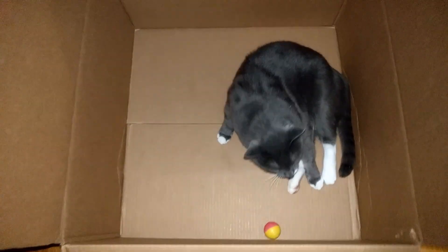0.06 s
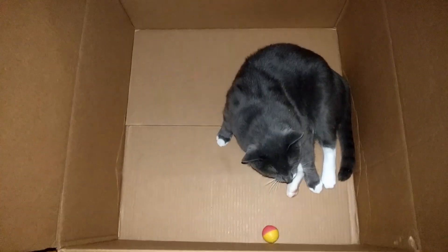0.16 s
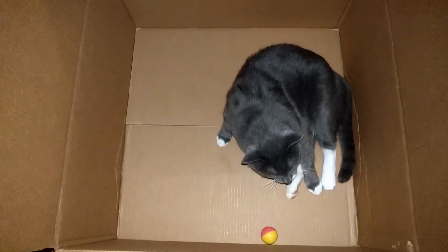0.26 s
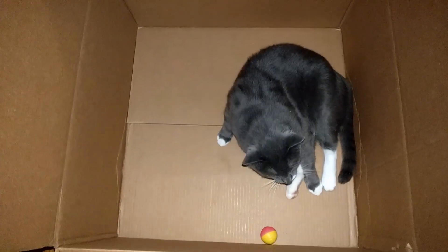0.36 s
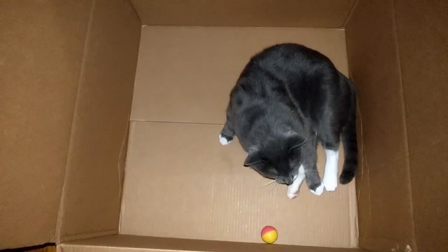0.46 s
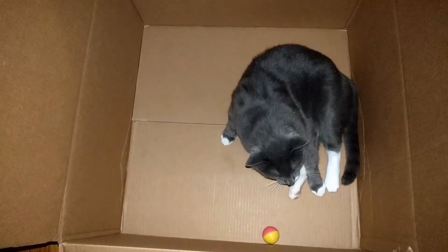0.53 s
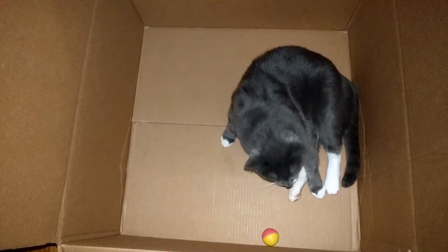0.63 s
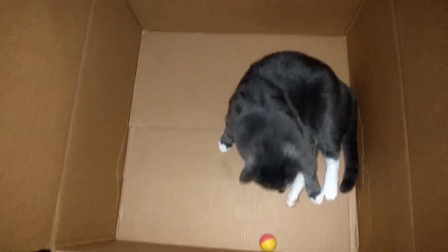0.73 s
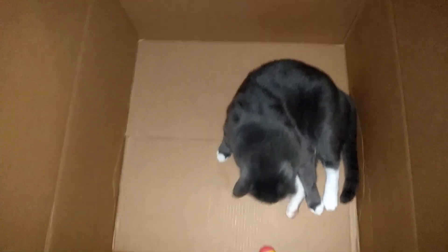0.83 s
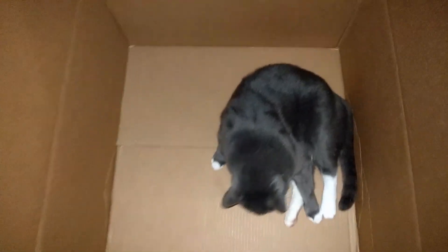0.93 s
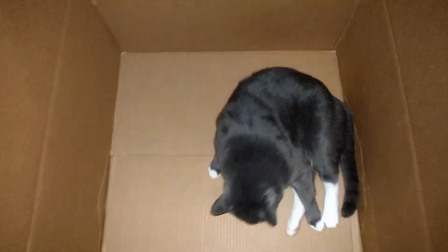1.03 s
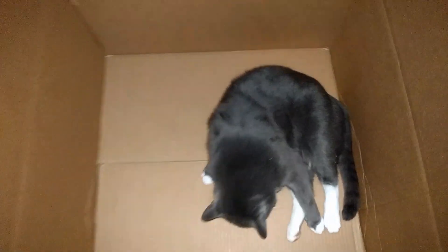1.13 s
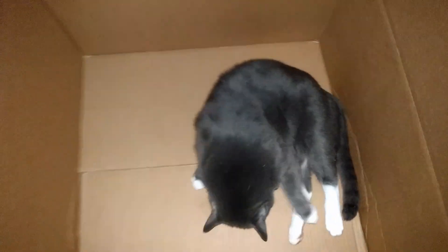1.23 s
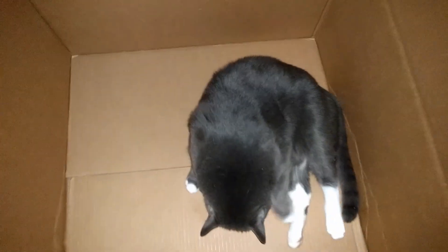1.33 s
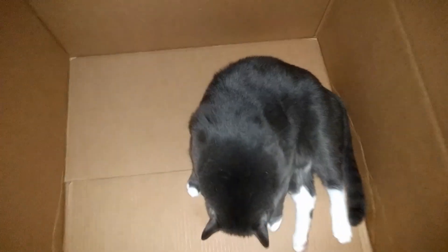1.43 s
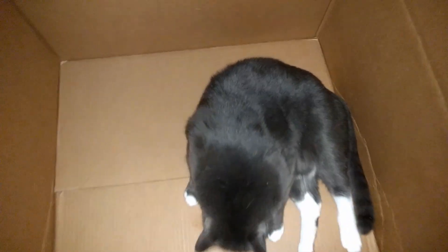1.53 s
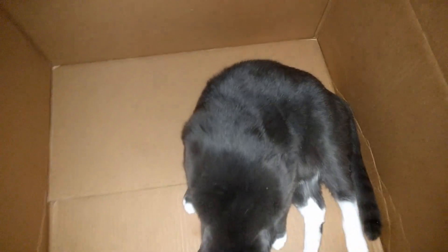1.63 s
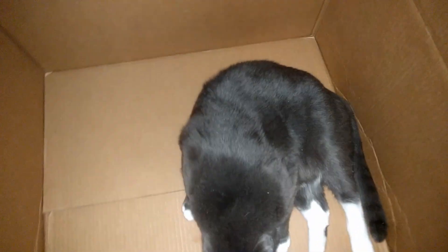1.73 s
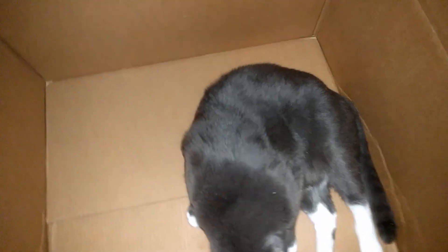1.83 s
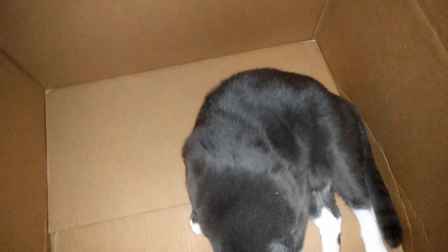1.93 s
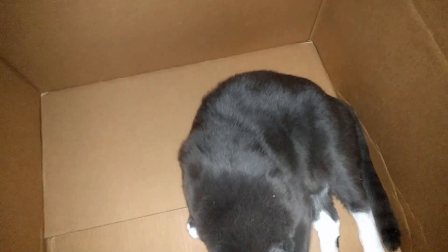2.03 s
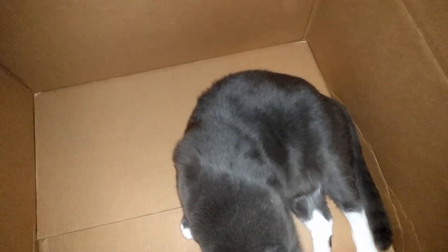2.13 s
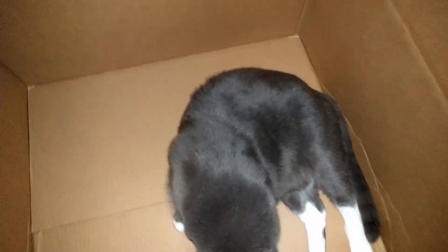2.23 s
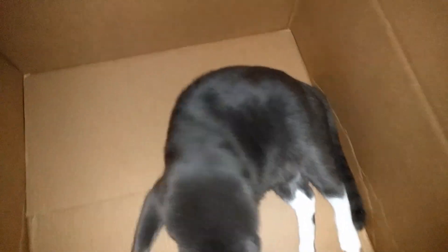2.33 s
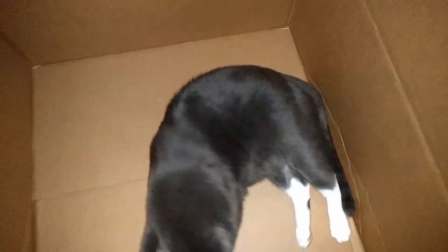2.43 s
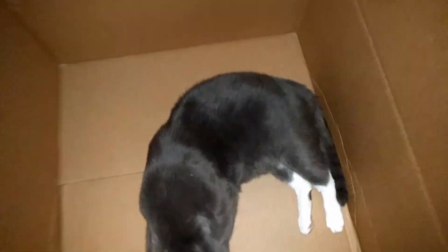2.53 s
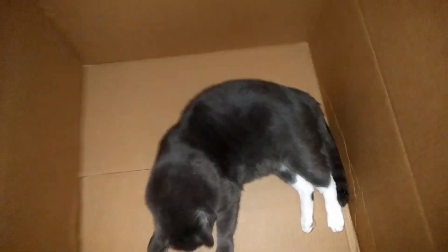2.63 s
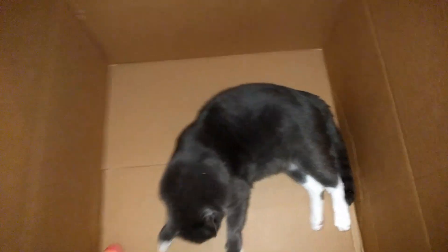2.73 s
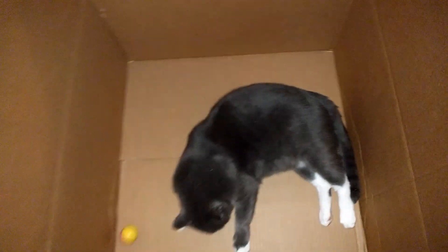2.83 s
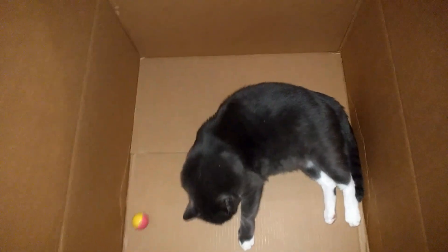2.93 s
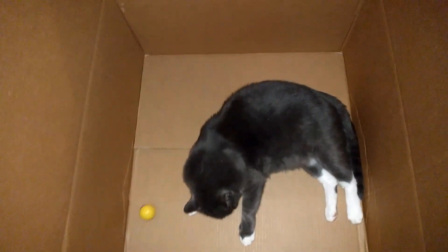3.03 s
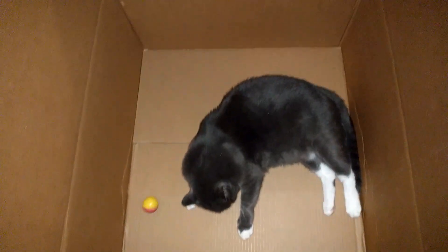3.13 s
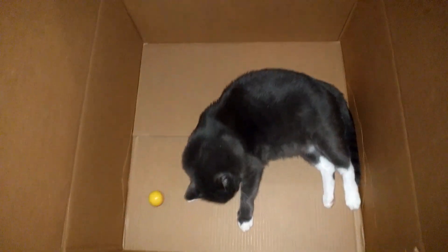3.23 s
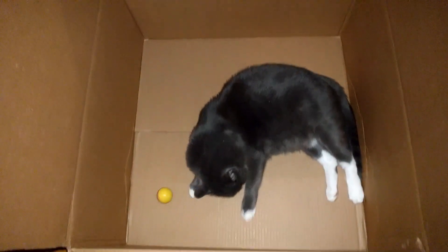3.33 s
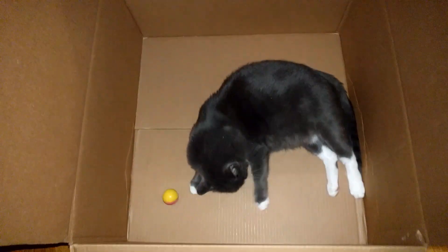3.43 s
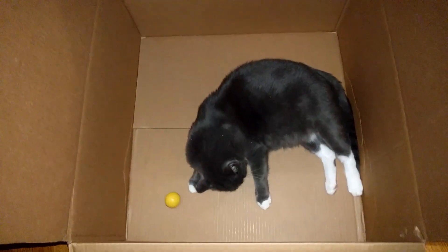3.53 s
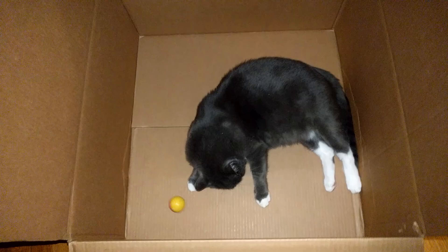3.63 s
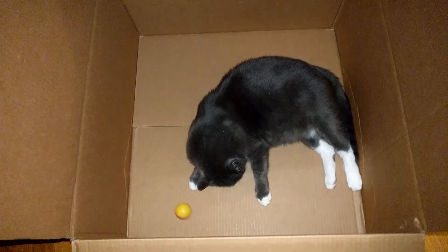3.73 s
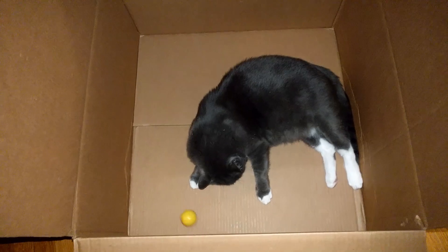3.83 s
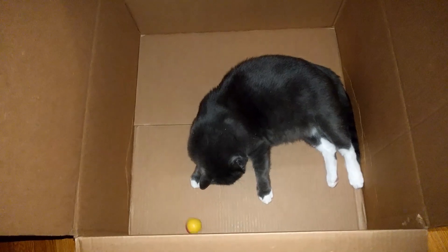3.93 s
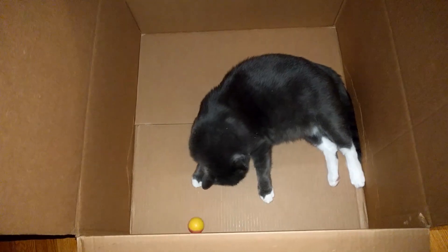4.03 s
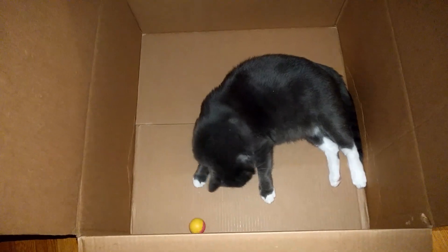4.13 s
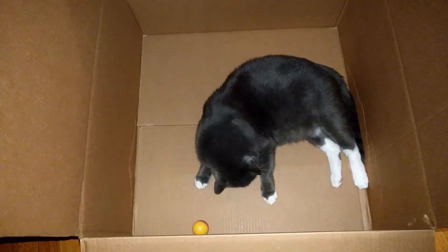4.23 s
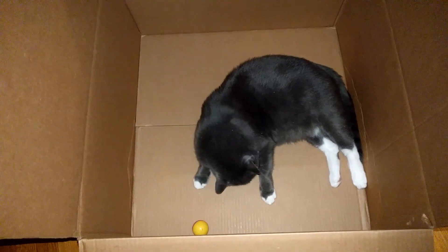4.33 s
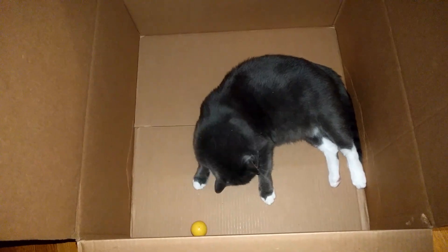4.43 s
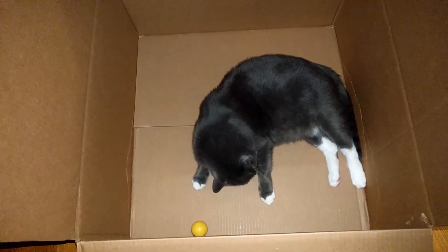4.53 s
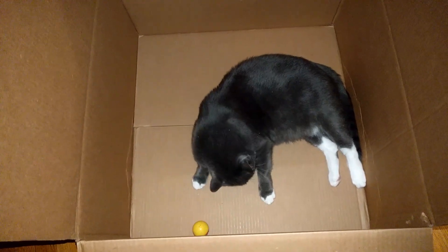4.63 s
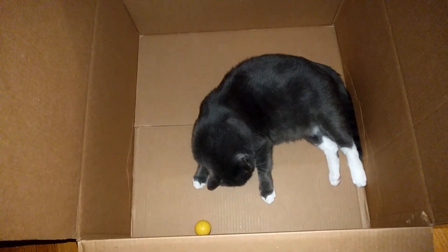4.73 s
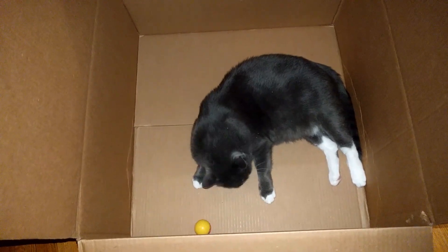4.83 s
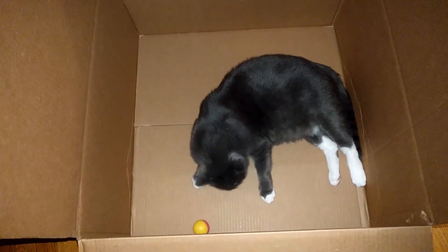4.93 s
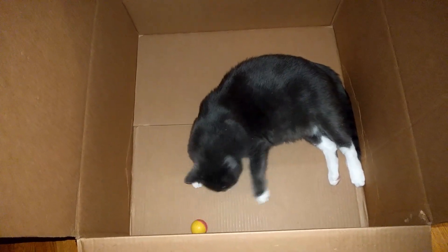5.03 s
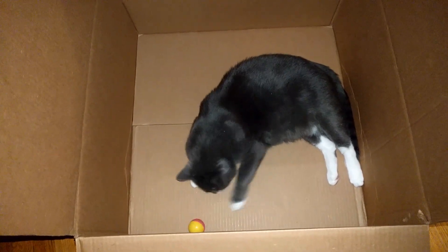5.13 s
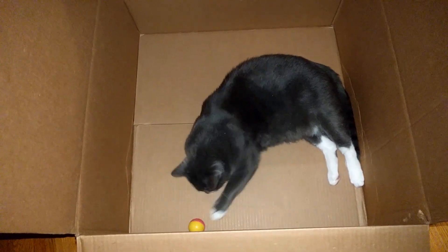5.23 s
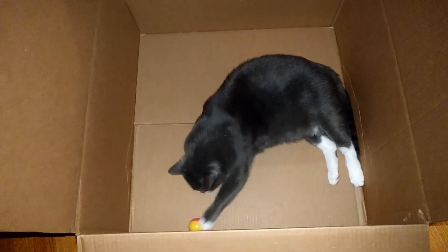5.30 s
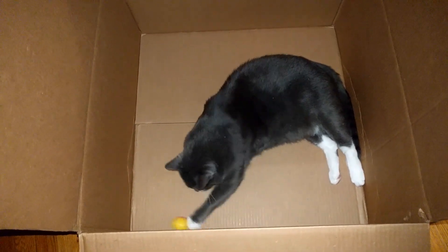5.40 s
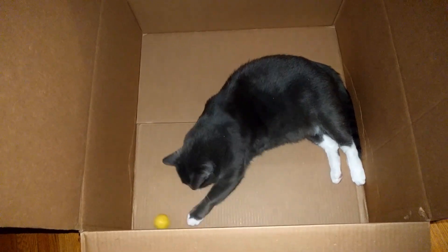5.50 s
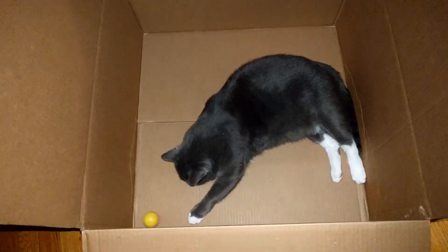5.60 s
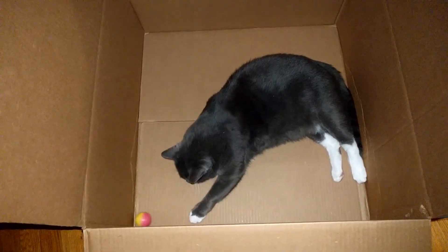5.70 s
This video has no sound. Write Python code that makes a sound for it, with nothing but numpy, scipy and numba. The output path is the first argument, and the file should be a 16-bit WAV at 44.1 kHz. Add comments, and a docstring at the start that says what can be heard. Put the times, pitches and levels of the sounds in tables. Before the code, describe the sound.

A cat moves inside a large cardboard box in a quiet room, heard closely from above by a phone with bright, slightly harsh treble. From 0 to 0.9 s there are faint hissing swipes of fur and small claw ticks over low room tone. A sharp tick lands at about 1.0 s, then soft coat brushing swells until 1.9 s. At 2.0 s a broad rub and a low shove begin; from 2.3 to 2.6 s claws catch rapidly on the board in a dense crackling scrabble, capped by a loud hollow knock at 2.6 s and further knocks to 2.73 s, ringing briefly. The rubbing fades by 3.4 s. Sparse shuffles, ticks and light taps follow, with a clearer boxy knock at 4.1 s and small ones at 4.7 and 5.1 s. From 5.4 to 5.75 s a quick scratchy flurry of fur and claws flares, then drops to near silence.

```python
"""Inside a large open cardboard box, heard by a phone from above, a cat shifts about and bats a small ball.
First come light swipes of hissing fur and ticking claws; from 2 s broad rubbing grows to a burst of claw catches
and hard knocks on the walls near 2.5 s, then sparse shuffles and light knocks, and a last flurry from 5.4 s.
Stick-slip noise makes the rubbing; short contacts make ticks and cracks and ring the panels and hollow.
The microphone peaks in the treble on fur and ticks; its suppressor turns quiet passages down."""
import sys
import numpy as np
from scipy import signal
from scipy.fft import rfft, irfft
from scipy.io import wavfile
from scipy.ndimage import uniform_filter1d
from numba import njit

SR = 44100
rng = np.random.default_rng(int(sys.argv[2]) if len(sys.argv) > 2 else 0)


def materialize(psi):
    """Save the field psi as 16-bit PCM at rate SR to the path in sys.argv[1].

    A 1-D psi becomes a single channel; in a 2-D psi each row is a channel.
    """
    bounded = np.clip(np.atleast_2d(psi).T, -1, 1)
    quanta = np.round(bounded * 32767).astype(np.int16)
    wavfile.write(sys.argv[1], SR, quanta)


def nominal_scale(level):
    """Amplitude ratio for a level in decibels (scalar or array-like)."""
    x = np.asarray(level, float) / 20
    return 10 ** x


N = 254016

# treble peak of the microphone: frequency_hz, gain_db
MICROPHONE = [(20, 4.5), (4000, -3.5), (5400, 5.5), (6600, 15), (7500, 7.5), (9000, -7), (16000, -22.5)]
# panels under the cat's weight: multiplier of the losses, bass gain in dB
LOADED = dict(damping=18, bass_db=-2.5)


def coloured(x, points):
    """Causal minimum-phase filter whose gain joins the (Hz, dB) points."""
    hz, db = np.transpose(points)
    size = 2 ** 13
    grid = np.maximum(np.fft.rfftfreq(size, 1 / SR), 1)
    log_gain = np.log(nominal_scale(np.interp(np.log(grid), np.log(hz), db)))
    # folding the cepstrum forward in time makes the filter causal
    cepstrum = irfft(log_gain)
    cepstrum[1:size // 2] *= 2
    cepstrum[size // 2 + 1:] = 0
    impulse = irfft(np.exp(rfft(cepstrum)))
    return signal.fftconvolve(x, impulse)[:N]


def unit(x):
    """Scale to rms 1."""
    return x / np.sqrt(np.mean(x ** 2))


def walk(rate):
    """Random levels held 1 / rate s and slewed twice; rms 1."""
    hold = int(SR / rate)
    levels = np.repeat(rng.standard_normal(N // hold + 1), hold)
    slewed = uniform_filter1d(uniform_filter1d(levels, hold), hold)
    return unit(slewed[:N])


def grit(rate, spread_db, flicker_db):
    """Stick-slip contact: rate catches a second of very unequal size whose strength wavers."""
    catches = rng.random(N) < rate / SR
    # the largest catch is 5 spreads above the smallest, ahead of the random sign and scatter
    size_db = spread_db * np.minimum(rng.exponential(size=N), 5)
    size = nominal_scale(size_db) * rng.standard_normal(N)
    return catches * size * nominal_scale(flicker_db * walk(45))


def echo(x, t60):
    """Dense reflections between the walls of the box and the room behind it: decaying, softened noise."""
    t = np.arange(SR // 2) / SR
    decay = np.exp(-np.log(1000) * t / t60)
    tail = rng.standard_normal(len(t)) * decay * np.minimum(t / 0.0034, 1)
    tail = signal.lfilter([.6], [1, -.4], tail)
    return signal.fftconvolve(x, tail / np.sqrt(np.sum(tail ** 2)))[:N]


def ring(force, damping, bass_db):
    """The box answers a force with all its modes; a body on the board raises their losses and holds the bass down."""
    # panels and hollow of the box: frequency_hz, relative level_db, t60_s ahead of the damping
    modes = [(198.6, 3, 0.43), (211.7, -18, 0.05), (240, -15, 0.32), (311, -4.5, 0.039), (327, -19.5, 0.13),
             (356, -9, 0.28), (428.5, -0.5, 0.33), (455, -1.5, 0.052), (513, -7, 0.16), (603, -23.5, 0.47),
             (709, -10, 0.18), (810, -5.5, 0.13), (872, -9.5, 0.13), (1071, -14, 0.1), (1166, -1.5, 0.091),
             (1295, -19, 0.37), (1520, -13.5, 0.26), (1635, -15, 0.2), (2010, -24, 0.088),
             (2160, -20.5, 0.15)]
    t = np.arange(SR // 2) / SR
    answer = 0
    for k, (hz, db, t60) in enumerate(modes):
        decay = np.exp(-np.log(1000) * damping * t / t60)
        answer = answer + (-1) ** k * nominal_scale(db) * decay * np.sin(2 * np.pi * hz * t)
    # the panels take a few ms to fill and radiate no deep bass
    answer = answer * np.minimum(t / 0.0034, 1)
    answer = coloured(answer, [(40, bass_db - 31.0), (120, bass_db - 8.5), (200, bass_db), (300, 0.79)])
    return signal.fftconvolve(force, answer / np.abs(answer).max())[:N]


def room_noise():
    """The steady room tone: noise with most of its strength in the bass."""
    # room tone: frequency_hz, gain_db
    room_colour = [(18, -41.5), (30, -1), (66, -0.5), (1630, -26), (1810, -24.5), (4420, -29.5),
                   (6720, -26), (9970, -36.5), (11700, -28), (16000, -28)]
    level_db = -65  # ahead of the suppressor
    return nominal_scale(level_db) * unit(coloured(rng.standard_normal(N), room_colour))


def background():
    """Gain of the quiet background, and the brushing of the coat in dB; both sink in the suppressor's dips."""
    # the coat brushing the board as the cat leans about: time_s, level_db ahead of the dips
    coat = [(0, -70), (.66, -70.5), (.93, -63.5), (1.08, -57.5), (1.4, -55), (1.85, -56), (2.0, -60),
            (2.3, -52), (2.8, -52.5), (3.25, -58), (3.4, -60.5), (4.0, -66.5), (4.6, -67.5), (5.4, -70.5),
            (5.58, -49.5), (5.69, -55), (5.76, -72)]
    # dips where the suppressor briefly turns the quiet background down: start_s, length_s, depth_db
    dips = [(0.2, 0.018, -0.5), (0.435, 0.03, -22), (0.65, 0.016, -2), (4.678, 0.029, -19.5),
            (4.946, 0.118, -6.5), (5.303, 0.044, -4.5), (5.432, .03, -7)]
    edge_s = 0.038  # slope on either side of a dip
    t = np.arange(N) / SR
    dip_db = 0
    for s, length, db in dips:
        corners = [s - edge_s, s, s + length, s + length + edge_s]
        dip_db = dip_db + db * np.interp(t, corners, [0, 1, 1, 0])
    return nominal_scale(dip_db), np.interp(t, *np.transpose(coat)) + dip_db


def strokes(table, attack, sag_db, fall_db):
    """One envelope per level column: strokes rise in attack s, sag over their length, then fall (dB a second)."""
    t = np.arange(N) / SR
    power = 0
    for s, length, *db in table:
        age = np.maximum(t - s, 0)
        loss_db = sag_db * np.minimum(age, length) + fall_db * np.maximum(age - length, 0)
        shape = np.minimum(age / attack, 1) * nominal_scale(-loss_db)
        power = power + (nominal_scale(np.array(db))[:, None] * shape) ** 2
    return np.sqrt(power)


def low_rumble():
    """Deep noise of rms 1, for weight shoved onto the floor of the box and the low rumble of the room."""
    # rumble: frequency_hz, gain_db
    push_colour = [(20, -39.5), (35, -12), (52, 5.5), (80, -1), (110, -1.5), (160, -12.5), (400, -42.5)]
    return unit(coloured(rng.standard_normal(N), push_colour))


def panel_drag(level):
    """The body drags in sparse stick-slip and drives the loaded panels; level scales the force."""
    rub = grit(1500, 2.5, 2.0)
    return ring(level * rub, **LOADED) / np.std(ring(rub, **LOADED))


def claw_scrape():
    """Claws scraping over the board: stick-slip strongest about 1 to 2 kHz, of rms 1."""
    # scraped board: frequency_hz, gain_db
    scrape_colour = [(300, -8), (700, 6.5), (1100, 7), (1450, 3.5), (1700, 7), (1950, 4), (2600, -6),
                     (5000, -17), (9000, -50)]
    return unit(coloured(grit(5000, 2.2, 1.8), scrape_colour))


def fine_fibre():
    """Fine fibres catching very densely: a flickering top treble of rms 1."""
    # fibre hiss: frequency_hz, gain_db
    fibre_colour = [(5000, -32), (9000, 5.5), (12000, -1), (16000, -3)]
    return unit(coloured(grit(15000, 1.5, 3.4), fibre_colour))


@njit
def streak(x, hz, width):
    """Band-pass of width Hz whose centre moves with every sample."""
    y, band, low = np.empty(len(x)), 0., 0.
    for i in range(len(x)):
        g = np.tan(np.pi * hz[i] / SR)
        k = width / hz[i]
        v = (band + g * (x[i] - low)) / (1 + g * (g + k))
        band = 2 * v - band
        low = low + 2 * g * v
        y[i] = k * v
    return y


def pad_scuff():
    """Pads stick and slip; narrow squeaky streaks wander through their hiss."""
    # pad hiss: frequency_hz, gain_db
    pad_colour = [(1200, -27), (2400, -5.5), (3300, -2.5), (4300, -1.5), (6000, -23.5)]
    rub = grit(8000, 2.0, 1.8)
    squeaks = 0
    for hz in (2630, 3530, 4600):
        level = nominal_scale(4. * walk(14))
        squeaks = squeaks + level * streak(rub, hz * (1 + 0.059 * walk(9.9)), 250)
    squeak_db = -2.5  # against the hiss
    return unit(unit(coloured(rub, pad_colour)) + nominal_scale(squeak_db) * unit(squeaks))


def fur_hiss():
    """Dense hair catches on the board, through the treble peak of the microphone; rms 1."""
    # fur on board: frequency_hz, gain_db
    fur_colour = [(300, -26), (1400, -9), (3000, -5.5), (4500, -5.5), (6500, -7.5), (9000, -8),
                  (12000, -26)]
    return unit(coloured(coloured(grit(14000, 1.8, 1.5), fur_colour), MICROPHONE))


def sliding():
    """Fur, pads, claws and body weight moving over the board: strokes on top of a quiet background."""
    # levels in these three tables are ahead of each stroke's rise and sag
    # paws and flank swiping over the board: start_s, length_s, fur_db, pad_db, fibre_db
    swipes = [(.07, 0.096, -65, -70, -75.5), (.25, 0.098, -69.5, -67.5, -83.5), (.54, 0.038, -71, -72, -88),
              (.69, 0.14, -62, -67, -79), (.82, 0.036, -59, -61.5, -79), (.87, 0.088, -61, -75, -77),
              (.99, 0.024, -47.5, -58, -70.5), (2.012, 0.14, -38, -44.5, -49.5),
              (2.202, 0.021, -39, -38.5, -52), (2.25, 0.078, -42.5, -61, -56.5),
              (2.305, 0.084, -35, -44, -43), (2.485, .17, -42.5, -53, -59.5),
              (2.69, 0.044, -44.5, -54, -66), (2.865, 0.12, -45, -69, -63.5), (3.03, .17, -50, -71, -68.5),
              (3.48, 0.078, -51.5, -82, -66.5), (3.635, 0.018, -50.5, -79, -63.5),
              (3.88, 0.018, -59, -81, -73), (4.12, 0.017, -50.5, -59, -83), (4.26, 0.086, -63, -84, -75),
              (4.74, 0.056, -70, -79, -83), (5.09, 0.043, -67, -76, -74.5), (5.15, 0.037, -59, -79, -72),
              (5.36, 0.057, -72, -85.5, -75), (5.465, 0.042, -43.5, -51.5, -69.5),
              (5.52, 0.019, -41, -49.5, -52.5), (5.63, 0.014, -44, -63, -58.5)]
    # claws scraping and the body dragging on the panels: start_s, length_s, claw_db, drag_db
    scrapes = [(.08, 0.1, -73, -63.5), (.25, 0.12, -66, -64), (.54, .04, -64.5, -68),
               (.69, 0.095, -64.5, -77), (.82, 0.026, -54.5, -59), (.99, 0.027, -47.5, -60.5),
               (2.012, 0.021, -58, -49), (2.07, 0.35, -59, -57.5), (2.29, 0.3, -54, -41.5),
               (2.39, 0.05, -58.5, -50.5), (2.435, 0.094, -56.5, -45.5), (2.495, 0.037, -43.5, -45),
               (2.57, .1, -44.5, -62), (2.69, 0.076, -55, -33), (2.81, 0.14, -56, -60),
               (2.98, 0.19, -59, -67), (3.42, 0.3, -63.5, -59.5), (3.75, 0.53, -64.5, -60.5),
               (4.12, .04, -50.5, -59.5), (4.175, 0.039, -68, -46.5), (4.535, 0.023, -70.5, -62.5),
               (4.74, 0.047, -67.5, -59), (5.15, 0.052, -71, -64.5), (5.465, 0.018, -43, -46.5),
               (5.52, 0.16, -57, -51.5), (5.68, 0.073, -60, -67)]
    # weight shoved onto the floor of the box: start_s, length_s, level_db
    shoves = [(.78, 0.056, -54.5), (.92, .1, -60.5), (1.37, .05, -58), (2.008, 0.064, -40),
              (2.145, 0.055, -43), (2.26, 0.26, -60), (2.455, 0.36, -48), (2.74, 0.19, -50.5),
              (2.93, 0.077, -56), (3.385, 0.088, -61), (4.06, 0.092, -54.5), (4.455, 0.034, -57.5),
              (5.19, .04, -64.5), (5.435, 0.046, -61), (5.525, .11, -55)]
    fur, pad, fibre = strokes(swipes, attack=.02, sag_db=12.5, fall_db=304.5)
    claw, drag = strokes(scrapes, attack=.02, sag_db=22.0, fall_db=250.5)
    push = strokes(shoves, attack=0.036, sag_db=16.0, fall_db=200.5)[0]

    quiet, coat_db = background()
    pad_db, fibre_db, claw_db = -9.5, -18.5, -12.5  # against the coat
    wander_db = 2  # rms wander of the quiet background: resting contact, and low rumble of the room
    quiet_fibre = quiet * nominal_scale(-76)
    quiet_claw = quiet * nominal_scale(-73.5 + wander_db * walk(8))
    quiet_drag = quiet * nominal_scale(-71 + wander_db * walk(2.8))
    quiet_rumble = quiet * nominal_scale(-65 + wander_db * walk(4))

    # strokes and background add as powers
    fur = np.hypot(fur, nominal_scale(coat_db))
    pad = np.hypot(pad, nominal_scale(coat_db + pad_db))
    fibre = np.hypot(fibre, np.hypot(nominal_scale(coat_db + fibre_db), quiet_fibre))
    claw = np.hypot(claw, np.hypot(nominal_scale(coat_db + claw_db), quiet_claw))
    drag = np.hypot(drag, quiet_drag)
    rumble = np.hypot(push, quiet_rumble)

    soft = fur * fur_hiss() + pad * pad_scuff() + fibre * fine_fibre()
    hard = claw * claw_scrape() + rumble * low_rumble() + panel_drag(drag)
    return soft + hard


def hits(table, contact_ms, rise, snap, board, echo_db, panels):
    """Each contact is a bright tick, a short crack of board and a soft push that rings the box."""
    # hard touch on board: frequency_hz, gain_db
    tick_colour = [(1000, -35.5), (3000, -10), (4500, -3.5), (6500, -10), (9000, -14), (12000, -21)]
    t = np.arange(SR // 20) / SR
    tick, crack, blow = np.zeros((3, N + len(t)))
    chance = rng.standard_normal((len(table), 2 * len(t)))
    age = 1000 * t / contact_ms
    # decay times of tick and crack, in contact lengths: the crack outlasts the tick
    fade = (1 - np.exp(-age / rise)) * np.exp(-age / np.array([[.8], [1.564]]))
    # half a sine of force: a longer contact excites fewer high modes
    push = np.sin(np.pi * np.minimum(age / 0.17, 1))
    for (s, tick_db, crack_db, blow_db, *_), noise in zip(table, chance):
        at = slice(int(s * SR), int(s * SR) + len(t))
        noise = noise.reshape(2, -1) * fade
        # a hard first touch adds one clean snap (to tick, to crack) at the height of the scatter
        noise[:, fade[0].argmax()] -= snap
        # every contact gets the energy of its fade
        noise_energy = np.sum(noise ** 2, axis=1, keepdims=True)
        noise *= np.sqrt(np.sum(fade ** 2, axis=1, keepdims=True) / noise_energy)
        tick[at] += nominal_scale(tick_db) * noise[0]
        crack[at] += nominal_scale(crack_db) * noise[1]
        blow[at] += nominal_scale(blow_db) * push / push.sum()
    bright = nominal_scale(6.0) * coloured(coloured(tick[:N], tick_colour), MICROPHONE)
    sharp = bright + nominal_scale(19.0) * coloured(crack[:N], board)
    return sharp + nominal_scale(echo_db) * echo(sharp, 0.29) + nominal_scale(4.5) * ring(blow[:N], **panels)


def claw_catches():
    """Claws slip over the ribs of the board, whose panels are damped by the cat's weight."""
    # catches: time_s, tick_db, crack_db, panel_blow_db (all ahead of the gains in hits)
    catches = [(.063, -35.5, -41, -63), (.219, -47.5, -56, -72), (.2461, -32, -48.5, -62),
               (.3479, -47, -60, -60), (.5272, -47, -55.5, -57), (.578, -42, -55.5, -76),
               (.6797, -51, -55.5, -57), (.7274, -62, -59, -59), (.815, -32, -39.5, -49),
               (.8354, -35, -50, -53), (.8585, -38, -59, -69), (.957, -61, -49.5, -67),
               (.9822, -31, -56, -74), (.9915, -20, -30.5, -47.5), (2.2148, -26.5, -41.5, -52),
               (2.3187, -27.5, -35, -35), (2.3304, -28, -50, -37), (2.3497, -23.5, -43, -28.5),
               (2.3705, -15.5, -57, -30), (2.395, -21, -29.5, -31), (2.4104, -23.5, -35, -34),
               (2.4236, -36, -27.5, -33.5), (2.4392, -24, -28.5, -40), (2.4551, -17.5, -28, -31),
               (2.4749, -23.5, -21.5, -49), (2.4852, -9.5, -25, -35), (2.5132, -32, -44, -32),
               (2.5298, -24, -39, -34), (2.5527, -21.5, -28.5, -58), (2.568, -31, -56, -30),
               (2.5874, -20.5, -35, -41), (2.881, -43, -44.5, -58), (2.973, -43, -47, -65),
               (3.4185, -44.5, -55, -50.5), (3.4695, -35.5, -51, -53), (3.487, -55, -53.5, -51),
               (3.5462, -37, -74, -73), (3.587, -55, -53, -56.5), (3.6446, -39, -63, -61),
               (3.708, -53, -57, -62), (3.9865, -48, -58, -65), (4.0292, -36, -56, -68),
               (4.0445, -60, -56, -50), (4.789, -39.5, -61, -55), (5.1844, -42, -65, -58),
               (5.4853, -43, -47.5, -58), (5.4968, -30.5, -53, -57), (5.5308, -30, -65, -71),
               (5.5419, -24.5, -70, -57), (5.5762, -21.5, -58, -54), (5.5962, -36, -41, -42.5),
               (5.6087, -25.5, -39.5, -70), (5.6391, -31, -44, -66), (5.6639, -33, -47, -54),
               (5.7279, -38.5, -47, -49.5)]
    # cracking board: frequency_hz, gain_db
    crack_colour = [(300, -27.5), (800, -6.5), (1150, -14), (1300, -4.5), (1420, -1.5), (1680, -8),
                    (1980, 0.5), (2250, -16), (3500, -18), (9000, -40.5)]
    return hits(catches, contact_ms=2.3, rise=0.52, snap=[.4, 6.], board=crack_colour,
                echo_db=-12.5, panels=LOADED)


def thuds(table):
    """Knocks also rock the whole box on the floor: one low decaying note, scaled by the last column."""
    t = np.arange(SR // 2) / SR
    pitch_hz, t60_s = 119.6, 0.27
    decay = np.exp(-np.log(1000) * t / t60_s)
    note = np.sin(2 * np.pi * pitch_hz * t) * decay * np.minimum(t / 0.0068, 1)
    force = np.zeros(N)
    for s, *_, thud_db in table:
        force[int(s * SR)] = nominal_scale(thud_db)
    return signal.fftconvolve(force, note)[:N]


def wall_knocks():
    """Ball and paws knock on free walls, which ring longer than the loaded ones."""
    # knocks: time_s, tick_db, crack_db, panel_blow_db (these three ahead of the gains in hits), thud_db
    knocks = [(2.599, -9.5, -23, -16.5, -27), (2.6508, -24.5, -45, -33, -41),
              (2.6915, -26.5, -30, -21.5, -29.5), (2.7301, -39, -53, -36.5, -27),
              (3.7566, -49, -51.5, -53.5, -65), (3.9103, -47.5, -60, -49.5, -60),
              (3.9675, -49.5, -59.5, -48.5, -56), (4.114, -40, -38.5, -24, -49),
              (4.401, -67, -64.5, -53, -62.5), (4.5263, -47.5, -60.5, -49, -81.5),
              (4.7339, -61, -66, -44, -71), (5.0881, -52, -57.5, -42.5, -75.5),
              (5.2602, -64, -68.5, -62, -68), (5.3522, -59, -70.5, -54.5, -67),
              (5.4194, -67, -72, -59, -72)]
    # slapped wall: frequency_hz, gain_db
    slap_colour = [(300, -12.5), (750, 2.5), (1100, -3.5), (1500, -1), (2000, -1), (2600, -9), (4000, -12),
                   (9000, -39.5)]
    struck = hits(knocks, contact_ms=3.2, rise=0.037, snap=[6., 6.], board=slap_colour,
                  echo_db=-15.5, panels=dict(damping=1.15, bass_db=-1.5))
    return struck + thuds(knocks)


def scene():
    """All sources sit close together; left and right differ by near reflections, most in the treble."""
    mid = room_noise() + sliding() + claw_catches() + wall_knocks()
    width_colour = [(60, -12.5), (200, -27.5), (700, -5.0), (7000, -3.5), (9500, 5.5), (12000, 11.5)]
    side = nominal_scale(-21) * coloured(echo(mid, .03), width_colour)
    return np.array([mid + side, mid - side])


def low_pass(x):
    """Removes everything above the highest recorded frequency."""
    return signal.sosfilt(signal.butter(12, 16260, fs=SR, output="sos"), x)


def record(dry):
    """A suppressor lowers the gain when the treble falls quiet; quiet passages are mono, loud ones slightly wide."""
    low_cut = signal.butter(2, 32, "high", fs=SR, output="sos")  # Hz
    dry = signal.sosfilt(low_cut, dry)
    mid, side = (dry[0] + dry[1]) / 2, (dry[0] - dry[1]) / 2
    treble = signal.lfilter([1, -1], [1, -.9], mid)
    level_db = 10 * np.log10(uniform_filter1d(treble ** 2, 1300) + 1e-14)
    gate_db, depth_db, softness_db = -66, 8.5, 4.9
    mid = mid * nominal_scale(-depth_db / (1.0 + np.exp((level_db - gate_db) / softness_db)))
    # weak stereo difference is lost: none below -43 dB of treble, all of it 3 dB higher
    kept = np.clip((level_db + 43) / 3, 0, 1)
    lean = -.035  # share of the middle by which the left port is weaker in the loud passages
    side = (side + lean * mid) * kept
    return low_pass(np.array([mid + side, mid - side]))


dry = scene()
out = record(dry)
materialize(out)
```